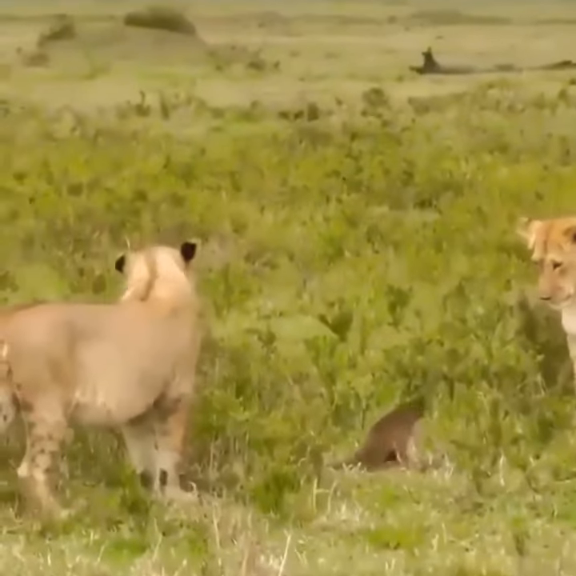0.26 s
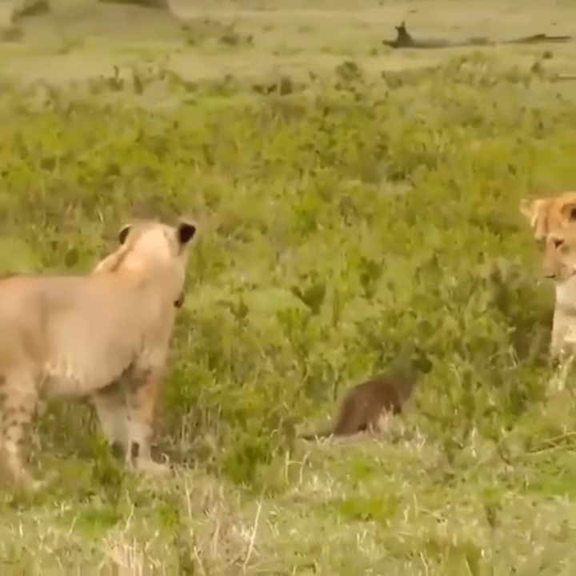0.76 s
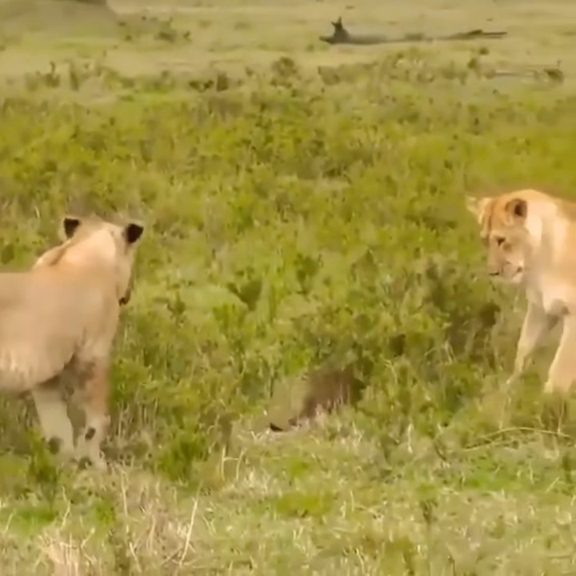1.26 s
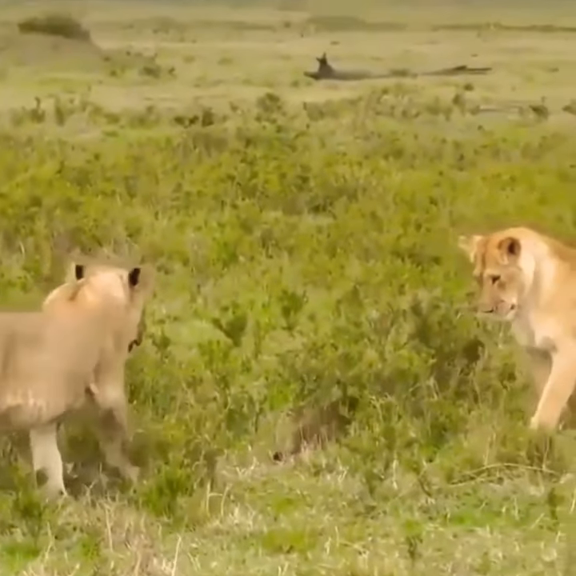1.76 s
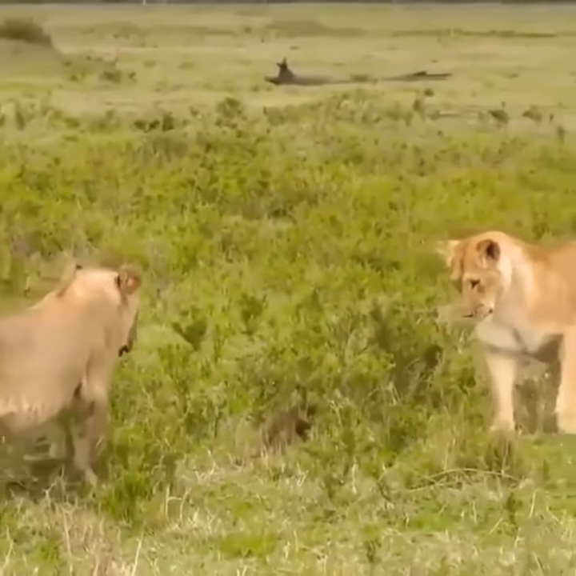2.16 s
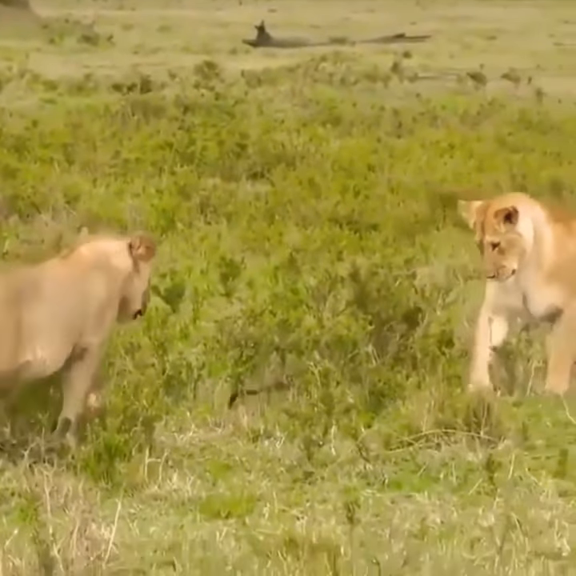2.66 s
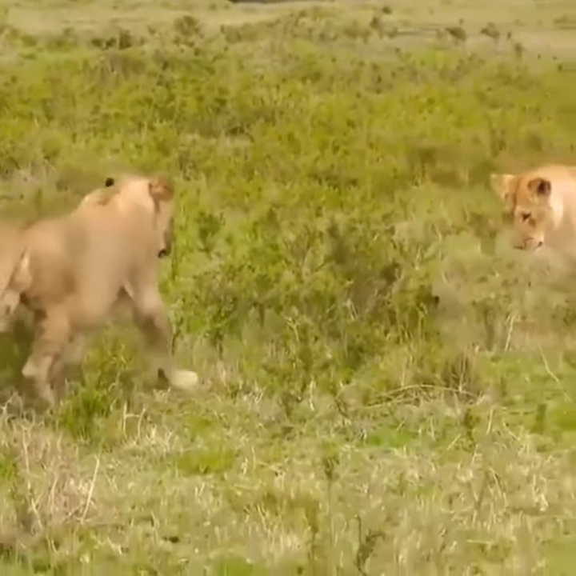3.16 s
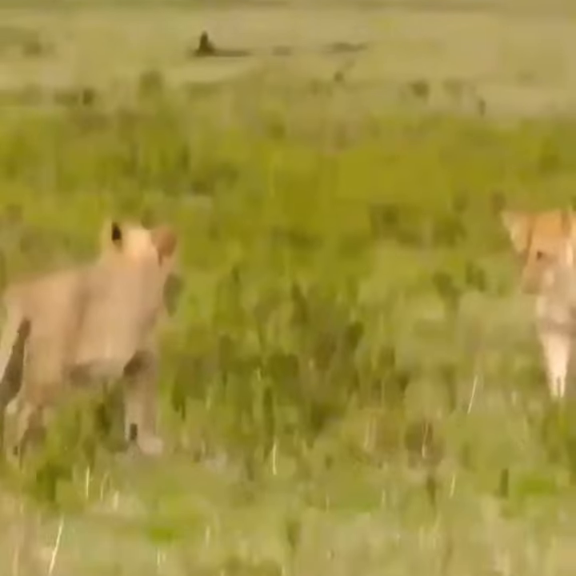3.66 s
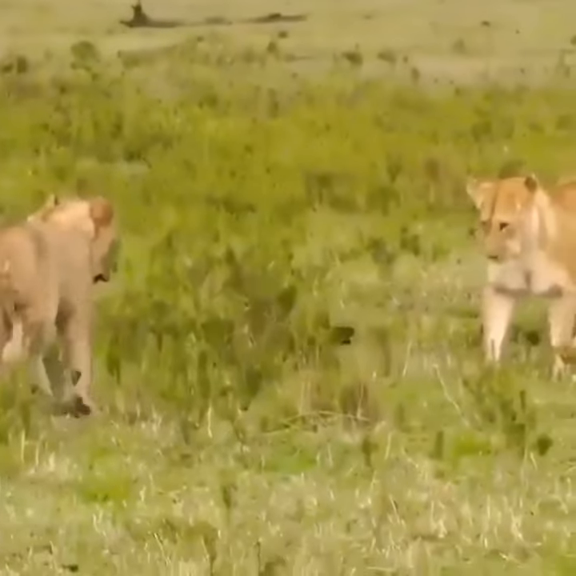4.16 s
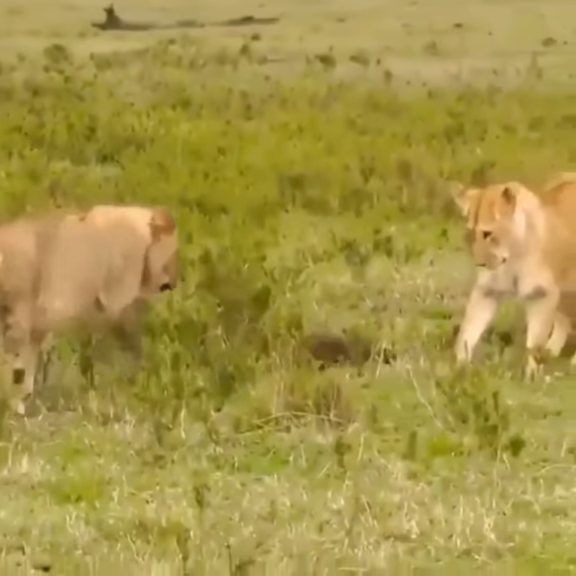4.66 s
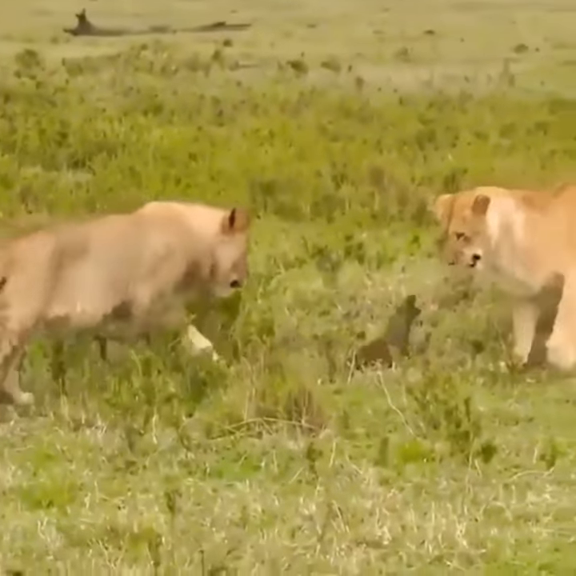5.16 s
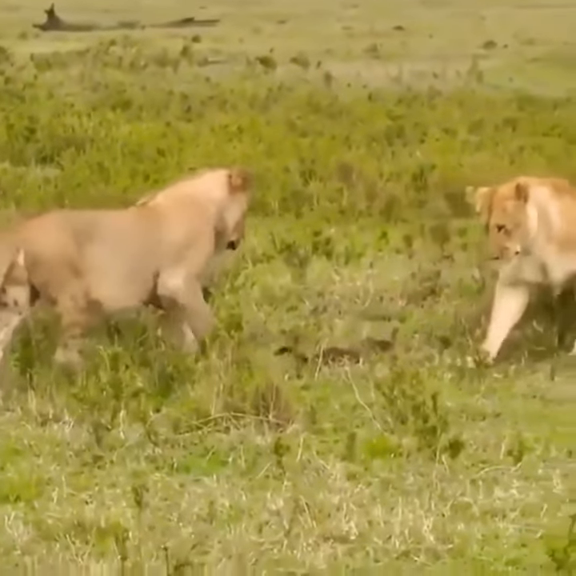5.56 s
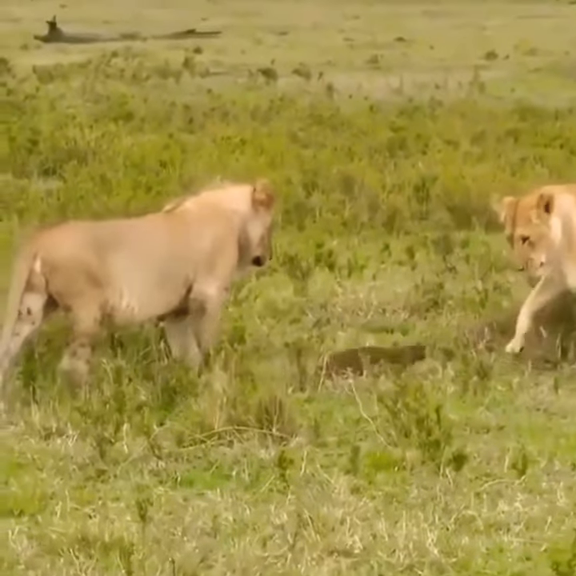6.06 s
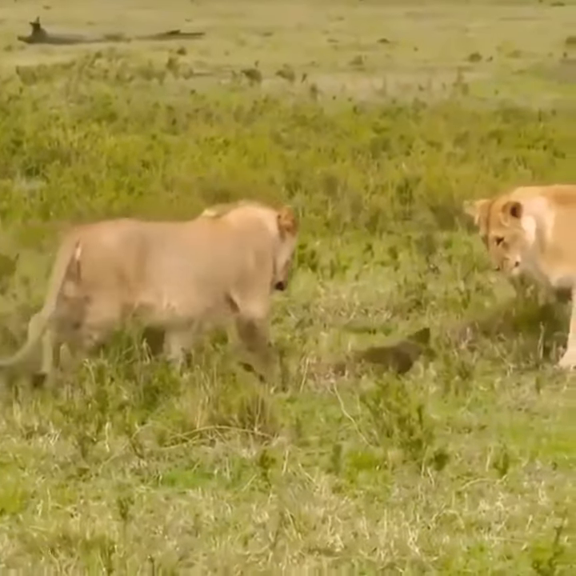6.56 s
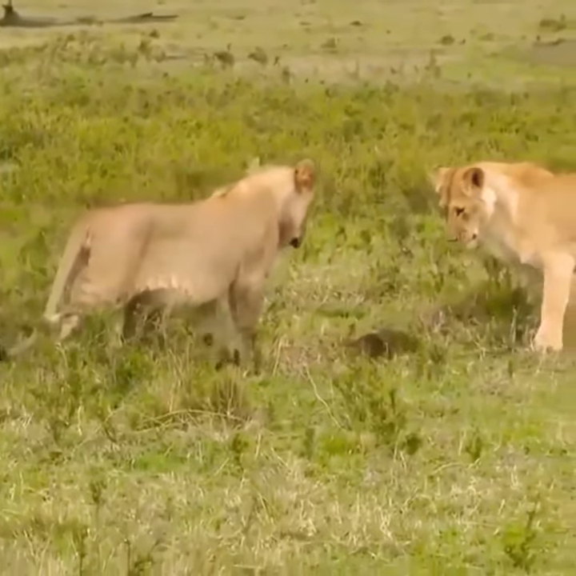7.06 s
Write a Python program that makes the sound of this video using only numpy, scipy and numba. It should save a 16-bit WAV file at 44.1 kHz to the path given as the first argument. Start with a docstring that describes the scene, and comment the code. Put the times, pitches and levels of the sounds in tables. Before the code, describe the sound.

A small mongoose screams at two lions in open grassland. Six harsh, high, fluttering calls, each under a second, come with pauses between them, shifting from ragged screeching to a tight buzz. Sputtering spits accompany the first two calls and return in the gap before the last. Faint grass rustles, tiny stem snaps and a few soft paw thuds sit beneath. Quiet open air, low wind bumping the microphone, almost no echo.

```python
"""A cornered mongoose screams at two lions on open grassland; hush, wind bumps and grass rustle run throughout.
From 0.07 s six harsh, quavering calls: folds squeal near 600 Hz, chopped by a flutter that locks into a buzz
or breaks into chaos. Noise-burst spits come in the first 1.4 s and again just after 6 s.
Decaying sine footfalls thud from 1.7 s; noise-burst stems snap from 2.1 s.
The mongoose's sound gains treble width and faint bush echoes, both by convolution with short noise."""
import sys
import numpy as np
from scipy import signal
from scipy.fft import rfft, irfft, next_fast_len
from scipy.io import wavfile
from scipy.ndimage import uniform_filter1d
from numba import njit

SR = 44100
rng = np.random.default_rng(int(sys.argv[2]) if len(sys.argv) > 2 else 0)


def output_pcm(signal):
    """Save a mono or channel-first signal as 16-bit PCM at the path in sys.argv[1].

    Samples are clipped to [-1, 1] before scaling.
    """
    pcm = np.clip(np.atleast_2d(signal).T, -1, 1) * 32767
    wavfile.write(sys.argv[1], SR, np.round(pcm).astype(np.int16))


N = 321478
T = np.arange(N) / SR
SIZE = next_fast_len(N, real=True)
BINS_HZ = np.maximum(np.arange(SIZE // 2 + 1) * SR / SIZE, 1)

# open-air hush spectrum: f/Hz, level/dB
HUSH_COLOUR = [(15, -42.5), (25, -1), (55, -6.5), (101, -8.5), (135, -23), (190, -10), (490, -13),
               (746, -13.5), (1600, -25), (1780, -16), (3170, -17.5), (3720, -21.5), (4470, -25.5),
               (12500, -55), (13500, -48.5)]
# distant drones: f/Hz, width/Hz, level/dB
DRONES = [(48, 4.2, -49.5), (589.4, 37, -60), (754, 130, -58.5)]
# gusts on the microphone, before eddies: middle t/s, half length/s, level/dB
GUSTS = [(.17, 0.13, -43), (.59, 0.18, -43), (1.15, .2, -45), (3.62, 0.11, -36), (3.98, 0.16, -36),
         (4.78, 0.11, -38), (5.04, 0.12, -37), (6.1, 0.077, -51), (6.85, 0.13, -44)]
# wind buffeting spectrum: f/Hz, level/dB
BUFFET_COLOUR = [(32, -39), (55, 3.5), (86, 1), (140, -6), (221, -10), (431, -13.5), (450, -60),
                 (580, -101), (990, -120)]
# bodies brushing through grass: middle t/s, half length/s, level/dB
BRUSHES = [(.5, 0.016, -26), (.585, .02, -29), (1.2, 0.15, -35), (2.25, 0.095, -51), (3.2, 0.17, -47.5),
           (5.05, .12, -53)]
# grass spectrum: f/Hz, level/dB
GRASS_COLOUR = [(1470, -2.5), (2500, -3), (3070, -8), (4240, -5), (5430, -8.5), (12500, -17.5),
                (13500, -33)]
# soft footfalls: t/s, nominal peak/dB, f/Hz
STEPS = [(1.698, -29, 370), (2.152, -29.5, 785), (2.389, -33, 586.5), (4.748, -27, 185),
         (5.025, -21.5, 239.2), (7.185, -26, 223.7)]
# grass stems snapping: t/s, nominal level/dB, decay/s
STEMS = [(2.093, -42, 0.018), (2.151, -46, 0.012), (2.2894, -46, 0.008), (2.337, -34, 0.024),
         (2.3594, -51, 0.0069), (3.0683, -33, 0.0094), (3.1944, -44, 0.02), (4.328, -47, 0.0049),
         (5.7867, -44, 0.0052)]
# calls: start t/s, end t/s, attack/s, release/s, fold f/Hz (usual flutter, before strain),
# roughness/0-1, hiss level/dB (re open-mouth ring, before locking)
CALLS = [(0.073, .722, 0.0087, 0.013, 613, 0.82, -7), (1.005, 1.705, 0.0039, 0.024, 597.7, 0.94, -7),
         (2.382, 2.651, .055, .009, 608, .7, -12), (3.383, 4.063, 0.013, 0.0081, 593.3, 0.81, -12.5),
         (4.764, 5.446, .006, 0.012, 589, .92, -9), (6.66, 7.133, 0.0045, 0.0085, 583, 0.8, -6.5)]
# flutter locked into a buzz: start t/s, end t/s, settling/s, roughness left/0-1
LOCKS = [(.19, 0.291, 0.0201, .5), (.325, .47, 0.027, 0.2), (2.518, 2.665, 0.025, 0.12),
         (3.386, 3.57, 0.049, 0.22), (3.623, 3.70, 0.011, .35), (3.773, 3.975, 0.0148, .18),
         (4.762, 4.965, 0.082, 0.06), (6.679, 7.174, .09, .06)]
# larynx flutter per call, before quaver and jitter: t/s, f/Hz
FLUTTER = [
    [(.08, 185), (.35, 172), (.41, 190), (.45, 191), (.47, 171), (.73, 165)],
    [(1.0, 180), (1.33, 178), (1.4, 169), (1.75, 160)],
    [(2.42, 160), (2.53, 166), (2.59, 162.4), (2.625, 160), (2.67, 150)],
    [(3.39, 170), (3.45, 180), (3.52, 186), (3.79, 184), (3.88, 187), (3.94, 173), (3.99, 165)],
    [(4.77, 153), (4.82, 167), (4.86, 177), (4.89, 179), (4.93, 173), (5.0, 187), (5.3, 175), (5.47, 160)],
    [(6.66, 170), (6.70, 190), (6.745, 191), (6.80, 181), (6.87, 175.5), (6.885, 167), (6.96, 161.5),
     (7.09, 150), (7.15, 141)],
]
# effort and mouth shape per call, before overall gains:
# t/s, level/dB, throat level/dB, open-mouth ring level/dB (both re the level)
EFFORT = [
    [(0.08, -13, -0.5, -2), (0.094, -15.5, -2.5, -1), (0.21, -18.5, -2.5, -8), (0.272, -19, 0.5, -5.5),
     (0.388, -13, -4.5, -10), (0.43, -13, -2.5, -3.5), (0.466, -16, -0.5, -10), (0.646, -16, -3.5, -5.5),
     (0.72, -16.5, -4.5, -8)],
    [(1.01, -14, -1, -8.5), (1.172, -17, 0, -9.5), (1.32, -14.5, 0.5, -10.5), (1.358, -18.5, -3.5, -12.5),
     (1.466, -18.5, -0.5, -20), (1.642, -15.5, -4.5, -14), (1.7, -19, -5, -19.5)],
    [(2.41, -36, -4, -4), (2.454, -24, -4, -10.5), (2.52, -17.5, -4, -12), (2.584, -16.5, -4.5, -8),
     (2.65, -18.5, -5, -13)],
    [(3.395, -25, 0.5, -4), (3.493, -21.5, -0.5, -4), (3.511, -18.5, -4, -2.5), (3.611, -15.5, -0.5, -12),
     (3.667, -15, -1, -5.5), (3.775, -15, 0, -12.5), (3.785, -19, 1, -5.5), (4.023, -15.5, -4.5, -7.5),
     (4.06, -18, 4, -4.5)],
    [(4.772, -29.5, 1, -4.5), (4.798, -24, -1, -1.5), (4.93, -22.5, -1, -6.5), (5.004, -15, -0.5, -11),
     (5.192, -18, -1, -12), (5.226, -16.5, 1.5, -10.5), (5.43, -21, -0.5, -17), (5.44, -25, -5, -19)],
    [(6.672, -16.5, -23.5, -8), (6.692, -16, -4.5, -6), (6.784, -17.5, -3, -7.5), (6.794, -14.5, -12, -13),
     (6.844, -12.5, -12, -10.5), (6.97, -20.5, -19, -15), (7.058, -19.5, -31, -12), (7.13, -22, 0.5, -8.5)],
]
# mouth shape per call: t/s, mouth f/Hz, open-mouth ring f/Hz (before RING_LIFT_HZ)
MOUTH = [
    [(0.08, 3000, 3490), (0.222, 2390, 3470), (0.308, 2780, 3260), (0.348, 2430, 3200), (0.414, 2640, 4100),
     (0.72, 2470, 3550)],
    [(1.01, 2560, 3650), (1.068, 2400, 3700), (1.132, 2900, 3540), (1.348, 2515, 3740), (1.7, 2540, 3740)],
    [(2.44, 2420, 3300), (2.614, 2407, 3774), (2.65, 2250, 3390)],
    [(3.4, 2290, 3900), (3.494, 2580, 3625), (3.914, 2460, 3614), (3.994, 2350, 3270), (4.06, 2370, 3370)],
    [(4.79, 2650, 3600), (4.896, 2260, 3780), (4.988, 2930, 3586), (5.266, 2752, 3190), (5.44, 2378, 3410)],
    [(6.67, 2435, 3270), (6.708, 2582, 3600), (6.97, 2340, 3310), (7.1, 2390, 3310)],
]
# fold harmonics: multiple, locked level/dB, chaotic level/dB
FOLDS = [(2, 4.5, 16), (3, 4.5, 21), (4, 4.5, -3.5), (5, -2.5, -1.5), (6, 1, -8.5), (7, -2.5, -12.5),
         (8, -3, -28.5), (10, 12.5, 13)]
# fixed throat resonances: f/Hz, width of each pass/Hz, level/dB
THROAT = [(1380, 300, -25), (1980, 480, 0)]
# breath hiss spectrum: f/Hz, level/dB
AIR_COLOUR = [(1000, 0), (2500, -50), (4500, 16), (6500, 0), (9000, -5.5), (13000, -26.5)]
# spits: t/s, hold/s, level/dB, low rasp level/dB (re level), treble gain/dB
SPITS = [(0.075, 0.0068, -19.5, -36, -20), (0.573, 0.027, -34.5, -3, 9), (0.972, 0.0037, -29.5, -18, -1),
         (.978, 0.026, -20.5, -17.5, -2), (1.318, 0.031, -32, -10, 6.5), (6.034, 0.0044, -27.5, -22, 1),
         (6.041, 0.025, -25, -15, 4), (6.078, 0.041, -28, -8, -1), (6.126, .03, -22, -16.5, -5.5)]
# spit hiss spectrum: f/Hz, level/dB
SPIT_COLOUR = [(880, -56), (1500, -16), (2030, -11.5), (2210, -6), (2800, -7.5), (5900, -9.5),
               (7030, -14.5), (11400, -21.5), (13500, -30)]
# spit rasp spectrum: f/Hz, level/dB
RASP_COLOUR = [(210, -55), (350, -20), (590, 9), (663, 1), (1340, 0.5), (1800, 1), (3000, -21), (3900, -29),
               (6600, -120)]

HUSH_DB, BREEZE_DB, RUSTLE_DB = -46, -55, -57  # breeze: before eddies
USUAL_FLUTTER_HZ, PITCH_EXPONENT = 172, 0.72  # fold pitch rises with this power of flutter rate
STRAIN_RATIO = 0.05  # pitch rise at full roughness
BREAK_S = 0.03015  # time for a lock to fall apart
LOCKED_BEND_RATIO = 0.58  # pitch bend kept at zero roughness
VOICE_DB, RING_DB = 0.5, -2  # overall gains
SPILL_DB = -5  # mouth's own power in the throat's range
LOCKED_THROAT_DB = -1  # at roughness 0.5; weaker drive the more locked
LOCKED_HISS_DB = -1.5  # at roughness 0: less air leaks
HISS_SPREAD_DB = 3
RING_LIFT_HZ, RING_WIDTH_HZ, RING_SMEAR_HZ = 103, 870, 600  # smear: width added at full roughness
EDGE_MULTIPLE, EDGE_DB = 8.19, -9  # thin upper resonance: multiple of fold pitch, level re ring
EDGE_FADE_DB = -10.5  # upper resonance drowned, at full chaos
CHEST_DB = -32.5  # low rasp around fold pitch, before the chaos factor
SPIT_ATTACK_S, SPIT_RELEASE_S, SPUTTER_SPREAD_DB, SPIT_TREBLE_HZ = 0.0005, 0.0065, 0.5, 5800
TOP_HZ = 13300


def undb(db):
    """Decibels to gain."""
    return 10 ** (np.asarray(db) / 20)


def unit(x):
    """Scale to rms 1."""
    return x / np.sqrt(np.mean(x ** 2))


def curves(table):
    """Table columns joined by straight lines in time."""
    t_s, *columns = np.transpose(table)
    return [np.interp(T, t_s, column) for column in columns]


def joined(tables):
    """Curves of all calls, one after another."""
    return curves([row for table in tables for row in table])


def steady(x, window_s):
    """Hold short-term rms near 1, keeping faster throbs."""
    size = max(int(window_s * SR / 2), 2)
    power = uniform_filter1d(uniform_filter1d(x ** 2, size), size)
    return x / np.sqrt(np.abs(power) + 1e-12)


def walk(rate_hz):
    """Random levels held one period and slewed; rms 1 or close to it."""
    size = max(int(SR / rate_hz), 1)
    held = np.repeat(rng.standard_normal(N // size + 1), size)
    return unit(uniform_filter1d(held, size)[:N])


def noise(colour):
    """Noise shaped by (f/Hz, level/dB) points, falling steeply outside them."""
    hz, db = np.transpose(colour)
    outside = np.minimum(BINS_HZ / hz[0], 1) * np.minimum(hz[-1] / BINS_HZ, 1)
    gain = undb(np.interp(np.log(BINS_HZ), np.log(hz), db)) * outside ** 4
    return unit(irfft(rfft(rng.standard_normal(SIZE)) * gain, SIZE)[:N])


def wide(colour, side_db):
    """Stereo noise: a centre part and a weaker, opposite-phase side part."""
    side = noise(colour) * np.array([[1], [-1]])
    return unit(noise(colour) + undb(side_db) * side)


def resonate(x, modes):
    """Steep resonances: band-passes applied twice, successive modes in opposite phase."""
    response = 0
    for k, (hz, width_hz, db) in enumerate(modes):
        detuning = (BINS_HZ ** 2 - hz ** 2) / (BINS_HZ * width_hz)
        response = response + (-1) ** k * undb(db) / (1 + 1j * detuning) ** 2
    return irfft(rfft(x, SIZE) * response, SIZE)[:N]


@njit
def bandpass(x, hz, width_hz):
    """State-variable band-pass with moving centre."""
    y, band, low = np.empty(len(x)), 0., 0.
    for i in range(len(x)):
        g = np.tan(np.pi * hz[i] / SR)
        k = width_hz[i] / hz[i]
        v = (band + g * (x[i] - low)) / (1 + g * (g + k))
        band, low, y[i] = 2 * v - band, low + 2 * g * v, k * v
    return y


def formant(x, hz, width_hz):
    """Steep resonance, two passes; centre and width may move."""
    width_hz = width_hz * np.ones(N)
    return bandpass(bandpass(x, hz, width_hz), hz, width_hz)


def burst(start_s, decay_s, attack_s):
    """Quick rise, exponential fall."""
    age_s = np.maximum(T - start_s + attack_s, 0)
    return np.minimum(age_s / attack_s, 1) * np.exp(-age_s / decay_s)


def gate(start_s, end_s, attack_s, release_s):
    """Straight rise, hold, exponential fall."""
    rise = np.clip((T - start_s) / attack_s, 0, 1)
    return rise * np.exp(-np.clip((T - end_s) / release_s, 0, 30))


def swells(table, rest_db):
    """Bell-shaped power swells over a resting level."""
    power = undb(2 * rest_db)
    for middle_s, half_s, db in table:
        power = power + undb(2 * db) * np.exp(-np.minimum(((T - middle_s) / half_s) ** 2, 20))
    return np.sqrt(power)


def plain():
    """Open-air hush, narrow-band far drones and low-pitched wind noise on the microphone."""
    hush = undb(HUSH_DB + 0.23 * walk(6)) * wide(HUSH_COLOUR, side_db=-14)
    drones = sum(undb(db) * unit(resonate(rng.standard_normal(N), [(hz, width_hz, 0)]))
                 for hz, width_hz, db in DRONES)
    eddies = undb(2.5 * walk(25))
    wind = swells(GUSTS, BREEZE_DB) * eddies * wide(BUFFET_COLOUR, side_db=-0.77)
    return hush + drones + wind


def grass():
    """Blades rustle in tiny noise grains, stems snap as noise bursts, paws thud as decaying sines."""
    grains = unit(undb(1.6 * walk(450) + 2 * walk(25)))
    rustle = swells(BRUSHES, RUSTLE_DB) * grains
    snaps = sum(undb(db) * burst(t_s, decay_s, attack_s=0.00094) for t_s, db, decay_s in STEMS)
    thuds = sum(undb(db) * burst(t_s, decay_s=0.008, attack_s=0.0018) * np.sin(2 * np.pi * hz * (T - t_s))
                for t_s, db, hz in STEPS)
    return (rustle + snaps) * wide(GRASS_COLOUR, side_db=-7.5) + thuds


def controls():
    """Fold pitch follows flutter and strain; each call is rough except where it locks."""
    flutter_hz, = joined(FLUTTER)
    pitch_hz, rough, hiss_db = joined([[(start_s, *voice), (end_s, *voice)]
                                       for start_s, end_s, _, _, *voice in CALLS])
    for start_s, end_s, settling_s, left in LOCKS:
        locked = np.clip(np.minimum((T - start_s) / settling_s, (end_s - T) / BREAK_S), 0, 1)
        rough = rough + locked * (left - rough)
    follow = (flutter_hz / USUAL_FLUTTER_HZ) ** PITCH_EXPONENT
    return pitch_hz * follow * (1 + STRAIN_RATIO * rough), flutter_hz, rough, hiss_db


def larynx(pitch_hz, flutter_hz, rough, jitter=0.32, scatter=0.083, shimmer_db=1.5,
           arch=0.049, fall=0.12, wobble=0.045, fits_db=2):
    """Each flutter cycle lets out a few fold vibrations; returns source, opening and chaos (0-1)."""
    # squared: slight roughness barely unsettles the lock; chaos comes in fits
    chaos = np.clip(rough ** 2 * undb(fits_db * walk(45)), 0, 1)
    quaver = 1 + 0.04 * rough * walk(40)
    phase = np.cumsum(flutter_hz * quaver * np.exp(jitter * chaos * walk(170))) / SR
    cycle, part = phase.astype(int), phase % 1
    pitch_chance, level_chance = rng.standard_normal((N // 100, 2))[cycle].T
    # slack tissue flutters slowly: shuts further, pitch sags more within each cycle
    slack = np.clip((186 - flutter_hz) / 24, 0, 1) * (1 - chaos)
    closure, sag = 0.35 + 0.35 * slack, fall + 0.07 * slack
    bend = -arch * np.cos(2 * np.pi * part) * (1 - slack / 2) - sag * (2 * part - 1)
    bend = bend * (LOCKED_BEND_RATIO + (1 - LOCKED_BEND_RATIO) * rough)
    # chaotic cycles each take their own pitch
    stray = chaos * (scatter * pitch_chance + wobble * walk(900))
    turns = np.cumsum(pitch_hz * quaver * (1 + bend + stray)) / SR
    # folds restart at every opening, so an even flutter gives clean lines
    turns = turns - np.interp(cycle, phase, turns)
    shimmer = undb(shimmer_db * np.sqrt(rough) * np.tanh(level_chance))
    opening = np.sin(np.pi * part) ** closure * shimmer
    # higher harmonics lag: a rounded wave, not a spiky one
    folds = unit(sum(undb(locked_db + (wild_db - locked_db) * chaos) * np.sin(2 * np.pi * k * turns - k ** 2 / 2)
                     for k, locked_db, wild_db in FOLDS))
    turbulence = (0.12 + 0.55 * np.sqrt(chaos)) * rng.standard_normal(N)
    return opening * (folds + turbulence), opening, chaos


def squeal(pitch_hz, chaos, squeal_db=-4.5, waver=0.053):
    """In chaos the third harmonic catches the throat resonance in short, nearly pure throbs."""
    hz = 3 * pitch_hz * (1 + waver * walk(130))
    throbs = unit(np.clip(walk(140) + 0.5, 0, 1))
    return undb(squeal_db) * chaos * throbs * np.sin(2 * np.pi * np.cumsum(hz) / SR)


def screams():
    """The larynx rings throat and mouth; a wider gape adds ring and hiss."""
    pitch_hz, flutter_hz, rough, hiss_db = controls()
    level_db, throat_db, ring_db = joined(EFFORT)
    mouth_hz, ring_hz = joined(MOUTH)
    sounding = sum(gate(*timing) for *timing, _, _, _ in CALLS)

    throat_share = np.sqrt(np.maximum(undb(2 * throat_db) - undb(2 * SPILL_DB), 0.003))
    throat_share = throat_share * undb(LOCKED_THROAT_DB * (1.5 - rough))
    ring_share = undb(ring_db + RING_DB)
    # the rest of the power, with a floor
    mouth_share = np.sqrt(np.maximum(1 - throat_share ** 2 - ring_share ** 2, 0.12))

    source, opening, chaos = larynx(pitch_hz, flutter_hz, rough)
    throat = steady(resonate(source, THROAT), 0.1) + squeal(pitch_hz, chaos)
    mouth = formant(source, mouth_hz, width_hz=680)
    ring = formant(source, ring_hz + RING_LIFT_HZ, width_hz=RING_WIDTH_HZ + RING_SMEAR_HZ * rough)
    ring = steady(ring, 0.16)
    edge = steady(formant(source, EDGE_MULTIPLE * pitch_hz, width_hz=620), 0.25)
    edge = undb(EDGE_DB + EDGE_FADE_DB * chaos) * edge
    chest = undb(CHEST_DB) * chaos * unit(formant(source, pitch_hz, width_hz=400))

    # neighbouring resonances of one tube swing in opposite phase
    voice = throat_share * steady(throat, 0.087) - mouth_share * steady(mouth, 0.031)
    voice = voice + ring_share * (ring - edge) + chest
    puffs = unit(opening * undb(HISS_SPREAD_DB * walk(60)))
    air_level = ring_share * undb(hiss_db + LOCKED_HISS_DB * (1 - rough))
    air = air_level * puffs * wide(AIR_COLOUR, side_db=-28)
    return sounding * undb(level_db + VOICE_DB) * (steady(voice, 0.065) + air)


def spits():
    """Sputtering blasts of air: gated noise with a low rasp of varying strength."""
    hiss, rasp = wide(SPIT_COLOUR, side_db=-15.5), wide(RASP_COLOUR, side_db=-7.5)
    lowpass = signal.butter(2, SPIT_TREBLE_HZ, fs=SR, output="sos")
    body = signal.sosfiltfilt(lowpass, hiss)
    treble = hiss - body
    blasts = 0
    for t_s, hold_s, db, rasp_db, treble_db in SPITS:
        envelope = undb(db) * gate(t_s, t_s + hold_s, SPIT_ATTACK_S, SPIT_RELEASE_S)
        blasts = blasts + envelope * (body + undb(treble_db) * treble + undb(rasp_db) * rasp)
    return undb(SPUTTER_SPREAD_DB * walk(400)) * blasts


def treble_width(x, side_db=-8, edge_hz=4400, spread_s=0.0031):
    """Stereo width above edge_hz: treble convolved with short noise, opposite phase left and right."""
    age_s = T[:SR // 10]
    response = rng.standard_normal(len(age_s)) * age_s * np.exp(-age_s / spread_s)
    response /= np.sqrt(np.sum(response ** 2))
    highpass = signal.butter(6, edge_hz, "high", fs=SR, output="sos")
    treble = signal.sosfilt(highpass, x.mean(axis=0))
    return undb(side_db) * signal.fftconvolve(treble, response)[:N] * np.array([[1], [-1]])


def bush(x, t60_s=0.22, echo_db=-29):
    """Shrubs return weak scattered echoes: convolution with decaying stereo noise."""
    age_s = T[:SR]
    response = rng.standard_normal((2, SR)) * undb(-60 * age_s / t60_s)
    response /= np.sqrt(np.sum(response ** 2, axis=1, keepdims=True))
    return undb(echo_db) * signal.fftconvolve(x, response, axes=1)[:, :N]


def scene():
    """Grassland, mongoose, its treble width and its echoes."""
    surroundings = plain() + grass()
    mongoose = screams() + spits()
    return surroundings + mongoose + treble_width(mongoose) + bush(mongoose)


def record(dry):
    """The recorder cuts the top: steep elliptic low-pass."""
    lowpass = signal.ellip(10, 0.2, 80, TOP_HZ, fs=SR, output="sos")  # ripple/dB, stop-band/dB
    return signal.sosfilt(lowpass, dry)


dry = scene()
out = record(dry)
output_pcm(out)
```